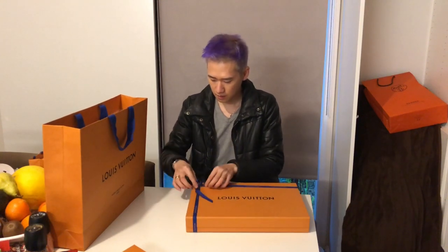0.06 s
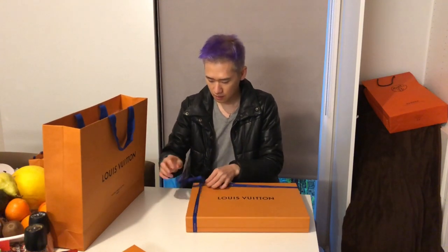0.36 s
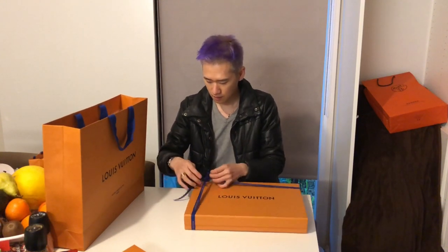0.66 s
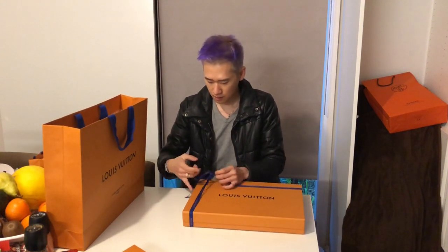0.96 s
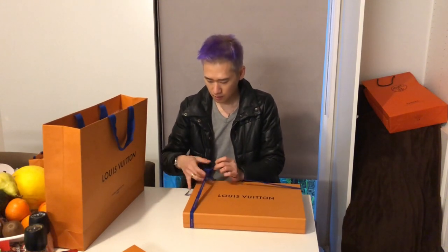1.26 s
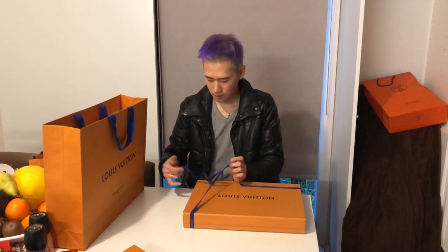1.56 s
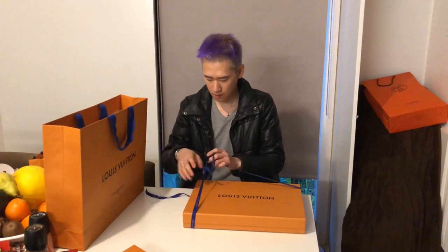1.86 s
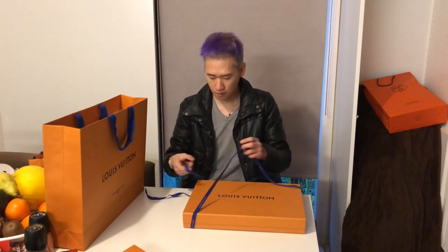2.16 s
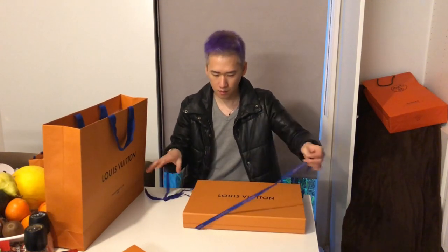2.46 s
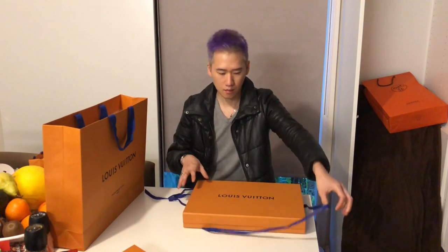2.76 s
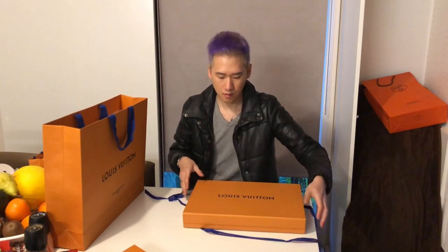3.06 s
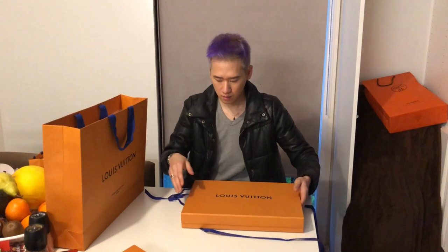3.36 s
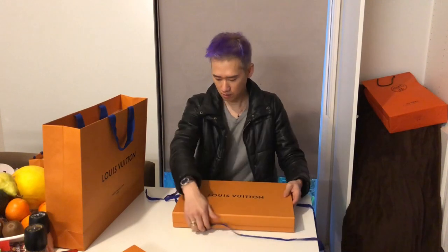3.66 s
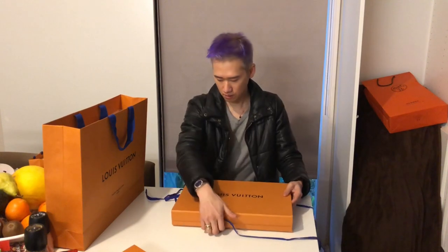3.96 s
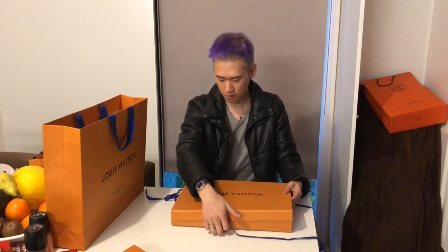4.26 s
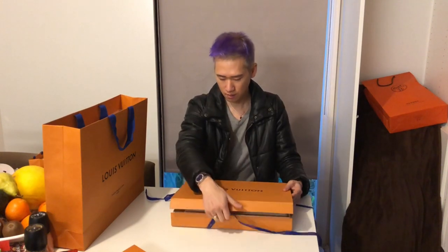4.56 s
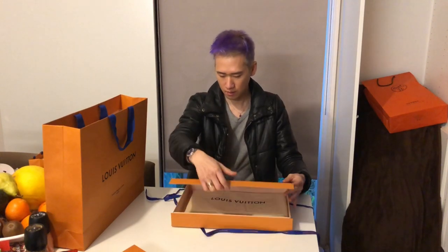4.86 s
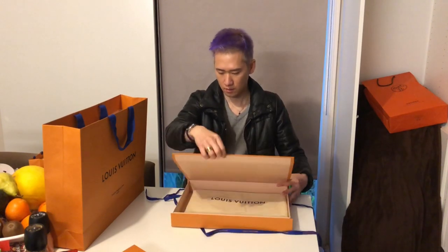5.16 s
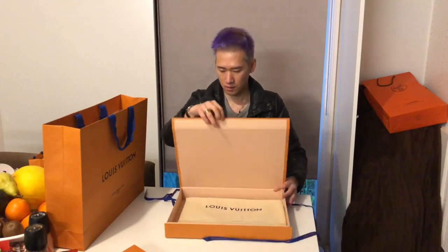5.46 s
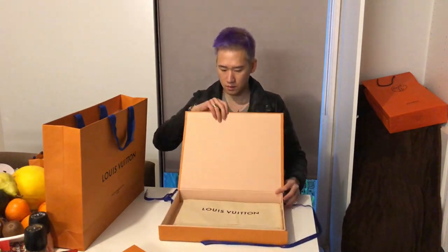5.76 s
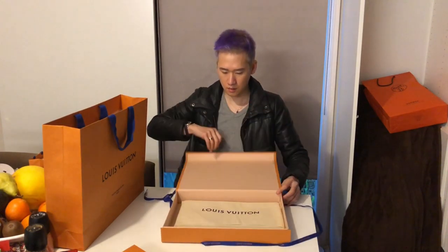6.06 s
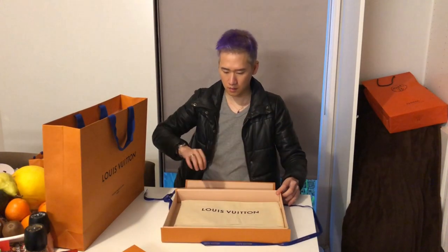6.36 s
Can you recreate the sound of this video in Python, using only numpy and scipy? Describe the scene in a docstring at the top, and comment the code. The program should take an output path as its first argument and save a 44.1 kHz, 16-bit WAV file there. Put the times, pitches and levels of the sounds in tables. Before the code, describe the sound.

For the first 2.7 seconds a satin ribbon is untied and drawn off a cardboard box: faint swishes and soft tugs, scattered small clicks, light hollow nudges and a brief rub near 0.4 seconds. Very faint squeaks and brushing of hands follow from about 3.1 seconds, then a hollow pat on the box at 3.7. From 4.2 to 4.6 the tight lid drags free in short, chattering, creaky scrapes. The card snaps crisply at about 5.1, 5.4 and 5.8 seconds, with a soft swish as the lid swings up. From 6.1 to 6.4 the lid goes down in a sharp, stuttering scrape, the loudest moment, and lands with a few quick thumps on the table. The microphone is a couple of metres away in a small, quiet room with slight reverberation and faint background air.

```python
"""Unwrapping a cardboard box

In a small quiet room, a satin ribbon is untied and drawn off a stiff box on a table. Hands nudge the
box; its tight lid is dragged free, snaps at the fold as it swings open, then scrapes down behind the
box and lands. Sliding friction gives the rustle, stick-slip the chatter, and impacts excite the damped
modes of the card. One microphone, a couple of metres away, receives direct and reverberant sound."""
import sys
import numpy as np
from scipy import signal
from scipy.fft import rfft, irfft, next_fast_len
from scipy.io import wavfile
from scipy.ndimage import uniform_filter1d

SR = 44100
rng = np.random.default_rng(int(sys.argv[2]) if len(sys.argv) > 2 else 0)


def transcribe(signal):
    """Save signal, clipped to [-1, 1], as a 16-bit WAV file at the path in sys.argv[1]."""
    frames = np.atleast_2d(signal).T
    limited = np.clip(frames, -1, 1)
    pcm = np.round(limited * 32767).astype(np.int16)
    wavfile.write(sys.argv[1], SR, pcm)


N = 291942
T = np.arange(N) / SR


def undb(db):
    """Amplitude ratio of a level in decibels."""
    return 10 ** (np.asarray(db) / 20)

def unit(x):
    """Normalisation to rms 1."""
    return x / np.sqrt(np.mean(x ** 2))

def peak_at(x, db):
    """Normalisation of the loudest 10 ms to an rms level."""
    return x * undb(db) / np.sqrt(uniform_filter1d(x ** 2, size=441).max())

def add(track, time, x):
    """Superposition of x on the track from a time in seconds."""
    i = int(round(time * SR))
    x, i = x[max(-i, 0):], max(i, 0)
    track[i:i + len(x)] += x[:N - i]

def colour(x, points):
    """Spectral shaping by (frequency [Hz], gain [dB]) points."""
    hz, db = np.transpose(points)
    size = next_fast_len(len(x))
    f = np.maximum(np.fft.rfftfreq(size, 1 / SR), 1)
    gain = undb(np.interp(np.log(f), np.log(hz), db))
    return irfft(rfft(x, size) * gain, size)[:len(x)]

def resonance(x, hz, width):
    """A damped oscillator: two-pole band-pass, gain 1 at the centre."""
    g, k = np.tan(np.pi * min(hz / SR, .45)), width / hz
    return signal.lfilter([g * k, 0, -g * k], [1 + g * k + g * g, 2 * g * g - 2, 1 - g * k + g * g], x)

def band(x, hz, width):
    """Two resonators in cascade give steep skirts."""
    return resonance(resonance(x, hz, width), hz, width)

def ring(x, modes):
    """Modal superposition: a panel's modes sound together; little radiates below the lowest."""
    y = sum(undb(db) * resonance(resonance(x, hz, width), hz, 1.73 * width) for hz, width, db in modes)
    return signal.sosfilt(signal.butter(4, 0.7 * modes[0][0], "high", fs=SR, output="sos"), y)

def bend(x, travel_at_1khz_s=0.002988):
    """Dispersion: short bending waves cross the card faster, so a click becomes a falling chirp."""
    size = next_fast_len(len(x))
    f = np.fft.rfftfreq(size, 1 / SR)
    turns = travel_at_1khz_s * (2 * np.sqrt(1000 * f) - f / 2)
    return irfft(rfft(x, size) * np.exp(-2j * np.pi * turns), size)[:len(x)]

def grit(n, rate, spread_db):
    """Shot noise: fibres catch and let go in uneven impulses, at a mean rate per second."""
    caught = rng.random(n) < rate / SR
    impulses = caught * rng.standard_normal(n)
    return unit(impulses * undb(spread_db * np.minimum(rng.exponential(size=n), 4)) + 1e-9)

def walk(rate):
    """Random modulation with a spread near 1, through `rate` points per second."""
    knots = rng.standard_normal(int(N / SR * rate) + 2)
    return np.interp(T * rate, np.arange(len(knots)), knots)

def gliding(hz, width):
    """Narrow-band noise: friction in one resonance whose centre moves."""
    slow = signal.sosfilt(signal.butter(2, width / 2, fs=SR, output="sos"), rng.standard_normal((2, N)))
    carrier = np.exp(2j * np.pi * np.cumsum(hz) / SR)
    return unit(np.real((slow[0] + 1j * slow[1]) * carrier))

def strokes(rows):
    """Incoherent addition: hand strokes speed up and slow down, and their powers sum to one envelope."""
    power = 0
    for time, db, rise in rows:
        width_s = np.where(T < time, rise, 0.037 + 0.59 * rise)
        power += undb(db) ** 2 * np.exp(-2 * ((T - time) / width_s) ** 2)
    return np.sqrt(power)

def sliding(rows, spectrum, gain_db, spread_db, flutter_db):
    """Sliding friction: fine noise of cloth or skin, fluttering with the pressure."""
    fibres = unit(colour(grit(N, rate=20000, spread_db=spread_db), spectrum))
    return fibres * strokes(rows) * undb(gain_db + flutter_db * walk(60))

def touch(rise, fall):
    """A transient contact builds and decays; returns its lead time, time axis and grainy force."""
    lead = 3 * rise
    t = np.arange(int((lead + 6 * fall + .1) * SR)) / SR - lead
    pressure = np.exp(-(np.minimum(t, 0) / rise) ** 2 - np.maximum(t, 0) / fall)
    return lead, t, pressure * grit(len(t), rate=24000, spread_db=1.0)

def blows(rows, modes, push=0.34, breadth=1.73, crack_hz=1450, corner_hz=2800, db_per_octave=13.5,
          release_s=0.0024, release_share=1.47):
    """Impact excitation: hardness (contact noise over body level) also wakes the higher modes."""
    out = np.zeros(N)
    for time, db, rise, hardness_db in rows:
        lead, t, force = touch(rise, release_s + release_share * rise)
        shove = force / np.linalg.norm(force)
        shove[np.searchsorted(t, 0)] += push  # one impulse on top of the grainy slip
        pole = np.exp(-2 * np.pi * corner_hz * 2 ** (hardness_db / db_per_octave) / SR)
        body = ring(signal.lfilter([1 - pole], [1, -pole], shove), modes)
        hz = crack_hz * (0.0019 / rise) ** 0.13  # a slow contact sounds lower
        crack = band(force, hz, breadth * hz)
        add(out, time - lead, peak_at(crack, db + hardness_db))
        add(out, time - lead + 0.0005, peak_at(body, db))  # the whole panel follows the contact spot
    return out

def room(x, wet_db, treble_db=-0.15, gap_s=0.0053):
    """Reverberation: the walls add a diffuse tail whose treble dies first."""
    # Room decay: (frequency [Hz], reverberation time [s])
    decay_times = [(150, 0.65), (450, 0.6), (1200, 0.45), (6000, 0.36), (14000, 0.32)]
    hz, t60 = np.transpose(decay_times)
    t = T[:SR // 2]
    noise = rfft(rng.standard_normal(len(t)))
    octave = np.log2(np.clip(np.fft.rfftfreq(len(t), 1 / SR), 125, 16000))
    onset = np.clip(t / gap_s - 1, 0, 1)
    tail = 0
    for centre in 125 * 2 ** np.arange(8):
        octave_noise = irfft(noise * np.maximum(1 - abs(octave - np.log2(centre)), 0), len(t))
        decay = onset * np.exp(-np.log(1000) * t / np.interp(np.log(centre), np.log(hz), t60))
        gain = undb(wet_db + treble_db * min(centre / 4000, 1))
        tail += gain * octave_noise * decay / np.linalg.norm(decay)
    return x + signal.fftconvolve(x, tail)[:N]

def all_round(source, wet_db, count=3):
    """Directivity: a panel sounds different each way; one way arrives direct, the walls blend several."""
    sides = [source() for _ in range(count)]
    return sides[0] + sum(room(x, wet_db) - x for x in sides) / np.sqrt(count)

def background(air_db=-62.5, hum_hz=101.3, hum_db=-75):
    """Ambient noise: still room air and a faint, amplitude-modulated hum."""
    # Room air: (frequency [Hz], relative spectral density [dB])
    spectrum = [(25, -40), (40, -7), (70, 3), (130, -2), (280, -4), (950, -14.5), (3000, -22.5),
                (9000, -27.5), (16000, -34.5)]
    air = unit(colour(rng.standard_normal(N), spectrum)) * undb(air_db)
    hum = np.sqrt(2) * np.sin(2 * np.pi * hum_hz * T) * undb(hum_db - 3 * walk(11))
    return air + hum

def brush():
    """Sliding friction of palms, sleeves and the lid's rim on the card."""
    # Strokes: (time of top speed [s], relative level [dB], rise [s])
    passes = [(3.56, -60.5, 0.16), (3.9, -62, 0.18), (4.52, -67, 0.21), (5.21, -60, 0.038),
              (5.47, -59, 0.058), (5.55, -52.5, 0.15), (6.08, -64, 0.1), (6.21, -52.5, 0.072)]
    # Friction noise: (frequency [Hz], relative spectral density [dB])
    spectrum = [(150, -7.5), (350, 11.5), (600, 4.5), (1100, 10), (3500, 3.8), (6000, 1.5), (9500, -1.5),
                (16000, -9)]
    return sliding(passes, spectrum, gain_db=4.0, spread_db=-0.1, flutter_db=1.5)

def squeak(hz=3150, width_hz=106, waver_hz=30):
    """Friction-induced vibration half locks into a rough, wavering whistle over a little rub."""
    # Hands slide along the edges: (time of top speed [s], relative level [dB], rise [s])
    slides = [(3.158, -59.5, .01), (3.32, -68, .015), (3.485, -64.5, 0.055), (3.64, -65, 0.045)]
    whistle = gliding(hz + waver_hz * walk(25), width_hz) * undb(walk(300))
    rub = undb(-5) * unit(band(rng.standard_normal(N), hz=3020, width=750))
    return (whistle + rub) * strokes(slides)

def swing(time=5.53, centre_hz=3090, octaves_per_s=3.5, db=-52, rise_s=0.06):
    """Friction at the lid's rim drives a resonance that rises as the lid swings up."""
    hz = centre_hz * 2 ** np.clip(octaves_per_s * (T - time), -1, 1)
    return gliding(hz, width=870) * undb(walk(270)) * strokes([(time, db, rise_s)])

def ribbon():
    """Sliding friction of satin on itself and on card, with tiny creases buckling at random."""
    # Pulls: (time of top speed [s], relative level [dB], rise [s])
    pulls = [(0, -65.5, 0.042), (.115, -69, 0.023), (.39, -66.5, 0.062), (.635, -62, 0.072),
             (.84, -68, 0.099), (1.08, -74, 0.19), (1.31, -60, 0.0482), (1.505, -59.5, 0.025),
             (1.63, -64.5, 0.1), (1.9, -59.5, 0.02), (2.34, -66.5, 0.054), (2.445, -67, 0.032),
             (2.605, -57, 0.027)]
    # Satin hiss: (frequency [Hz], relative spectral density [dB])
    spectrum = [(300, -1), (900, 7.5), (4000, 3.5), (9500, 3.5), (16000, -3.5)]
    hiss = sliding(pulls, spectrum, gain_db=-0.2, spread_db=2.5, flutter_db=4.5)
    crinkle = unit(band(grit(N, rate=90, spread_db=0), hz=4200, width=9000))
    return hiss + crinkle * strokes(pulls) * undb(-10)

def tugs(release_s=0.0063):
    """Static friction gives way in the ribbon's knot in short, soft rustles."""
    # Slips: (time [s], level [dB], rise [s])
    slips = [(1.396, -58, 0.0068), (1.498, -48.5, 0.014), (1.548, -54.5, 0.0028), (1.6, -53.5, .0015),
             (1.668, -51, 0.001)]
    # Rustle: (frequency [Hz], relative spectral density [dB])
    spectrum = [(200, -20), (700, -1.5), (1300, 0), (3000, -3), (5000, -12.5), (16000, -26)]
    out = np.zeros(N)
    for time, db, rise in slips:
        lead, _, force = touch(rise, release_s)
        add(out, time - lead, peak_at(colour(force, spectrum), db))
    return out

def ticks(decay_cycles=7.5, gain_db=-5.5):
    """Buckling: creases flip with a hollow tone from the card; the large, low ones are slower."""
    # Creases and catches of ribbon, leather and card: (time [s], relative level [dB], centre [Hz])
    creases = [(.215, -53, 2240), (0.551, -51.5, 7460), (.63, -51, 6100), (.832, -47, 1535),
               (1.052, -52.5, 1450), (1.106, -54, 1885), (1.159, -49, 1590), (1.171, -46.5, 1484),
               (1.325, -44, 2176), (1.338, -56, 2280), (1.42, -53, 2180), (1.711, -50.5, 2430),
               (2.985, -53.5, 2030), (3.341, -49, 1735), (3.996, -47, 2850), (4.322, -50.5, 8000),
               (4.394, -45, 4300), (4.462, -43.5, 3640), (4.632, -38, 3580), (4.641, -39.5, 2190),
               (4.845, -43, 3620), (5.065, -40, 9740), (5.257, -48, 1270), (5.385, -42, 1924),
               (5.767, -32, 2510), (6.273, -35, 2600)]
    out = np.zeros(N)
    for time, db, hz in creases:
        fall = decay_cycles / hz
        lead, _, force = touch(0.32 * fall, fall)
        hollow = undb(7) * band(force, hz=1100, width=650)
        add(out, time - lead, peak_at(band(force + hollow, hz, 1.53 * hz), db + gain_db))
    return bend(out)

def nudges():
    """Hands shift the closed box and excite its damped modes."""
    # Contacts: (time [s], level [dB], rise [s], hardness [dB])
    contacts = [(.004, -42, .004, -14), (.03, -48.5, .006, -11.5), (.264, -49, 0.0023, -44),
                (.445, -41.5, 0.02, -15), (.476, -49, 0.0088, -26), (.51, -51.5, 0.0036, -36),
                (.829, -40.5, 0.0022, -10), (.869, -51, 0.003, -1), (1.263, -42.5, 0.000984, -18),
                (1.33, -55.5, 0.0063, -8), (1.502, -51, 0.0031, -10), (1.713, -55.5, .0015, -24),
                (1.895, -48.5, 0.018, -22), (2.635, -62.5, 0.023, 4.5), (4.084, -51, 0.013, -0.5),
                (4.165, -48.5, 0.023, -18), (4.21, -41, .012, -6), (4.243, -48, 0.016, -16),
                (4.31, -45, 0.016, -5), (4.38, -53, 0.014, -26), (4.452, -44, 0.031, -1.5)]
    # Closed box: (frequency [Hz], bandwidth [Hz], gain [dB])
    modes = [(256, 26.6, 4.5), (331, 90, 1), (443, 110, -10.5), (541, 31, -3), (653, 70, -2), (796, 81, -5),
             (890, 67, -4.5), (1130, 190, -12.5)]
    return blows(contacts, modes, push=0.31, corner_hz=3290, db_per_octave=7.0,
                 release_s=0.0097, release_share=1.0)

def claps():
    """Impacts of the fingers, then the palm, set the box ringing."""
    # Contacts: (time [s], level [dB], rise [s], hardness [dB])
    contacts = [(3.734, -38, 0.00045, -10), (3.7395, -33, .0015, -11.5), (3.755, -40, 0.00069, -26),
                (3.789, -43.5, 0.000675, -12)]
    # Closed box pressed on the table: (frequency [Hz], bandwidth [Hz], gain [dB])
    modes = [(182, 67, 0), (308, 53, 1.5), (458, 69, 5.5), (596, 92, 0.5), (950, 190, -4.5),
             (1390, 470, -18.5)]
    return blows(contacts, modes)

def thumps():
    """Coupled vibration: the lid bumps and lands, and box and table ring together."""
    # Contacts: (time [s], level [dB], rise [s], hardness [dB])
    contacts = [(6.033, -54.5, 0.007, -16), (6.279, -35, 0.0032, -4.5), (6.308, -35, 0.0046, -4),
                (6.328, -34, .006, -29), (6.3535, -40, 0.0016, -2)]
    # Open box and table top: (frequency [Hz], bandwidth [Hz], gain [dB])
    modes = [(94.5, 25, -8), (175, 38, -5), (228, 38, 5), (335, 47, -3.5), (450, 65, -1.5), (545, 59, 1),
             (693, 60, -1.5), (836, 66, -4), (1100, 580, -13.5)]
    return blows(contacts, modes)

def snaps():
    """Sudden release launches bending waves as the lid lets go and its fold snaps."""
    # Releases: (time [s], level [dB], rise [s], hardness [dB])
    releases = [(4.825, -57.5, 0.00033, 13), (4.8575, -48, 0.00026, 4.5), (5.0642, -35, 0.00049, -4.5),
                (5.3845, -38.5, 0.00092, -6.5), (5.759, -50.5, 0.0003, 11.5), (5.7655, -41.5, 0.00052, -1)]
    # Free lid: (frequency [Hz], bandwidth [Hz], gain [dB])
    modes = [(396, 150, -11), (573, 130, -3), (690, 46, -14), (1032, 150, -12), (2096, 760, -13.5),
             (3100, 490, -14)]
    return bend(blows(releases, modes, push=0.77, breadth=4.4, crack_hz=2940, corner_hz=3870,
                      db_per_octave=3.0, release_s=0.002, release_share=4.1))

def drags(uneven_db=3.0, swell_db=3.5, focus_db=5):
    """Stick-slip: the card's edge chatters once per slip, the box walls ring and the paper rasps."""
    # Jerks: (time [s], length [s], starting slip rate [Hz], final slip rate [Hz], chatter level [dB],
    # roughness [0-1], wall level [dB], rasp level [dB], rasp resonance [Hz])
    jerks = [(.1, 0.041, 870, 854, -52.5, 0.14, -55.5, -61.5, 4600),
             (0.441, 0.042, 761, 693, -47.5, 0.22, -49, -54, 1550),
             (4.181, 0.019, 1497, 1680, -41, 0.13, -50, -42, 2030),
             (4.187, 0.0026, 4500, 3500, -37, 0.01, -60, -45.5, 5430),
             (4.191, 0.0054, 2200, 1400, -33.5, 0.02, -44.5, -60, 2200),
             (4.39, 0.03, 888, 840, -43, .1, -44.5, -48.5, 2000),
             (4.424, 0.061, 319, 349, -43, 0.1, -56, -55, 2100),
             (4.47, 0.054, 1300, 1285, -39.5, 0.09, -45.5, -69, 2100),
             (4.513, 0.07, 1303, 1258, -45, 0.24, -41.5, -63, 2100),
             (4.578, 0.057, 842, 833, -40, 0.17, -46, -61, 2080),
             (4.584, 0.054, 1392, 1338, -40, 0.19, -54, -68, 2110),
             (6.112, 0.0292, 1221, 997, -38, 0.05, -40, -40.5, 1920),
             (6.144, 0.015, 1086, 980, -43, 0.13, -41.5, -37, 5900),
             (6.194, 0.027, 1125, 1054, -33, 0.06, -51, -40, 5800),
             (6.232, 0.011, 3470, 3200, -46, 0.1, -62, -37, 3300),
             (6.236, 0.018, 1090, 1073, -39.5, 0.1, -48, -45, 6000),
             (6.27, 0.0164, 787, 647, -29, 0.1, -41, -42, 2600),
             (6.288, 0.012, 1050, 980, -34.5, 0.27, -41.5, -46, 2980),
             (6.304, 0.0129, 1308, 795, -31.5, 0.19, -42.5, -47, 1750)]
    # Box walls: (frequency [Hz], bandwidth [Hz], gain [dB])
    modes = [(333, 46, 8), (556, 69, -4), (707, 63, 10), (950, 130, -4), (1290, 930, -14.5)]
    # Paper rasp: (frequency [Hz], relative spectral density [dB])
    spectrum = [(150, -24), (500, 0), (1400, 6.5), (3300, 4.5), (4400, 1), (6200, -3.5), (8000, -2.5),
                (16000, -10.5)]
    out = np.zeros(N)
    for time, length, start_hz, end_hz, chatter_db, rough, walls_db, rasp_db, rasp_hz in jerks:
        t = np.arange(int((length + .05) * SR)) / SR
        edge_s = min(0.003, 0.18 * length)
        progress = np.minimum(t / length, 1)
        grip = np.minimum(t / edge_s, 1) * np.exp(-np.maximum(t - length, 0) / edge_s)
        grip *= undb(swell_db * np.sin(np.pi * progress))
        travel = np.cumsum(start_hz * (end_hz / start_hz) ** progress) / SR  # in nominal slips
        jitter, strength = rng.standard_normal(size=(2, 1000))
        slips = np.cumsum(np.exp(rough * jitter)) - 1
        cycles = np.interp(travel, slips, np.arange(len(slips)))
        chatter = grip * np.sin(2 * np.pi * cycles) * undb(uneven_db * np.interp(travel, slips, strength))
        rub = grip * grit(len(t), rate=20000, spread_db=-0.5)
        walls = ring(rub, modes)
        rasp = colour(rub, spectrum) + undb(focus_db) * band(rub, rasp_hz, 0.38 * rasp_hz)
        add(out, time, peak_at(chatter, chatter_db) + peak_at(walls, walls_db) + peak_at(rasp, rasp_db))
    return out

def scene():
    """Superposition of the sources, each group with its own reflections, the same in both channels."""
    rustle = ribbon() + tugs() + brush()
    box, hand, landing = nudges(), claps(), thumps()
    mono = room(rustle + squeak() + swing(), wet_db=-5.5)
    mono += room(box, wet_db=-4.5) + room(hand, wet_db=-4.5) + room(landing, wet_db=-6.5)
    mono += all_round(snaps, wet_db=-5.5) + all_round(ticks, wet_db=-5.5)
    mono += room(drags(), wet_db=-8)
    mono += background()
    return np.array([mono, mono])

def record(dry):
    """Band limiting: a steep low-pass at 16.1 kHz."""
    return signal.sosfilt(signal.ellip(10, .2, 70, 16100, fs=SR, output="sos"), dry)


dry = scene()
out = record(dry)
transcribe(out)
```